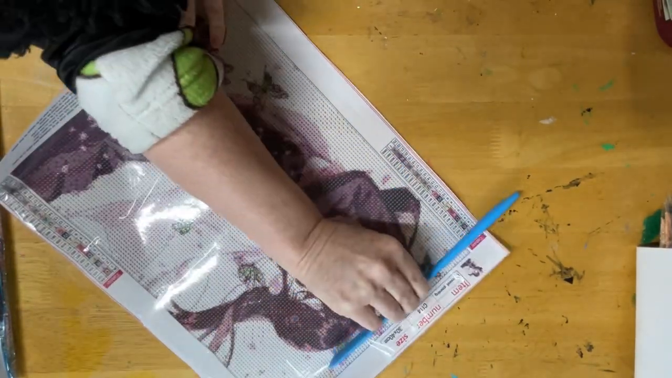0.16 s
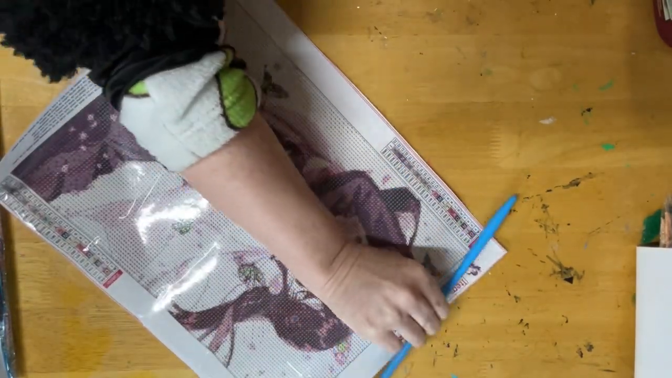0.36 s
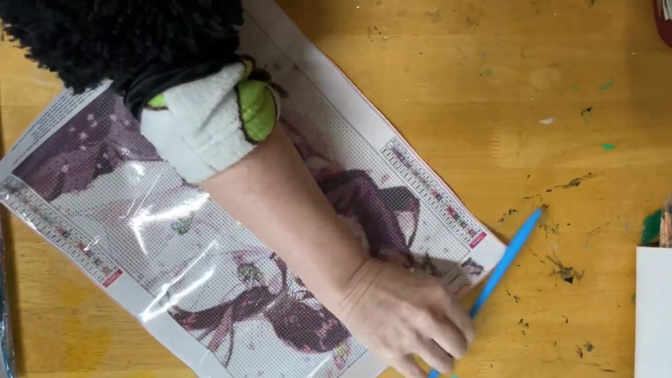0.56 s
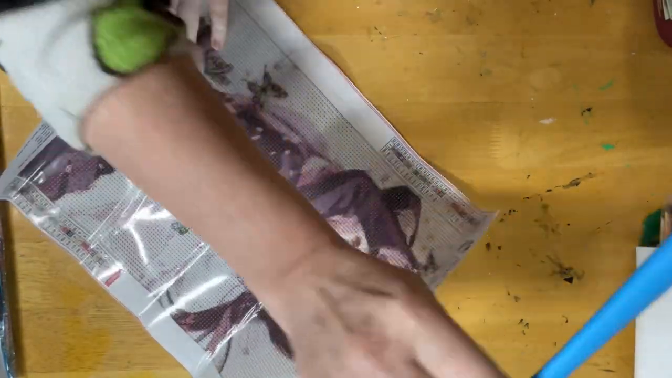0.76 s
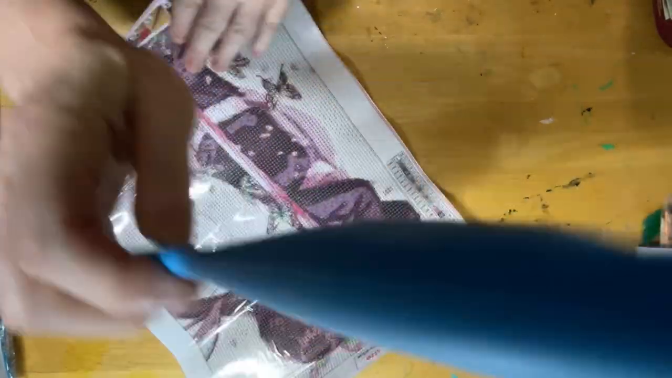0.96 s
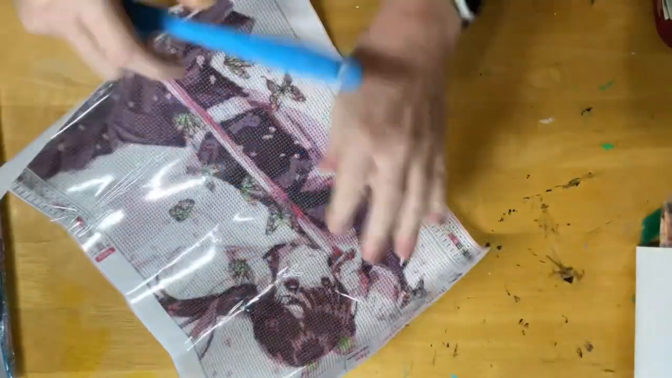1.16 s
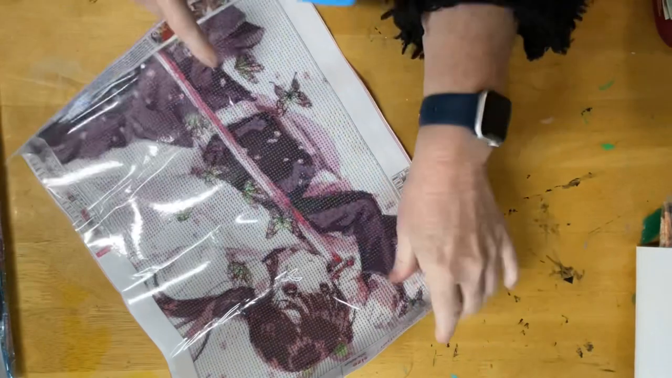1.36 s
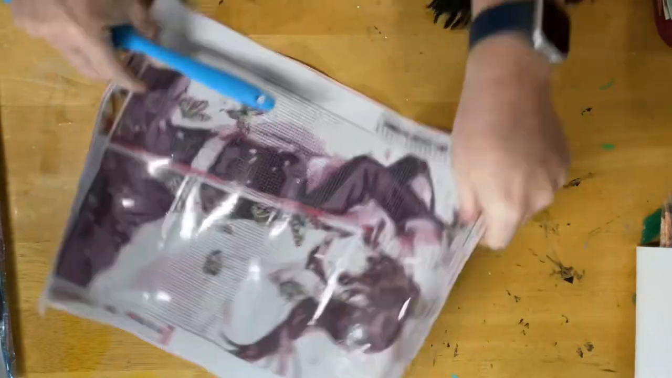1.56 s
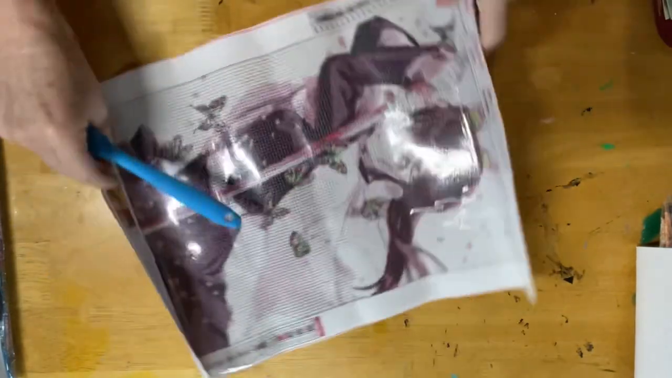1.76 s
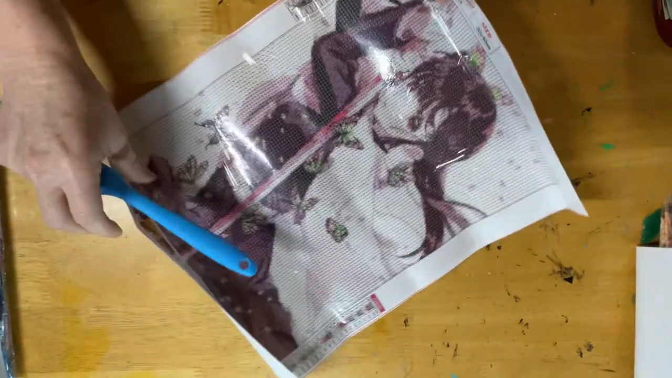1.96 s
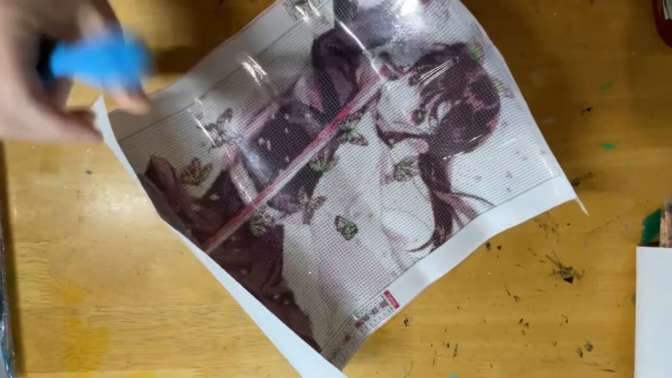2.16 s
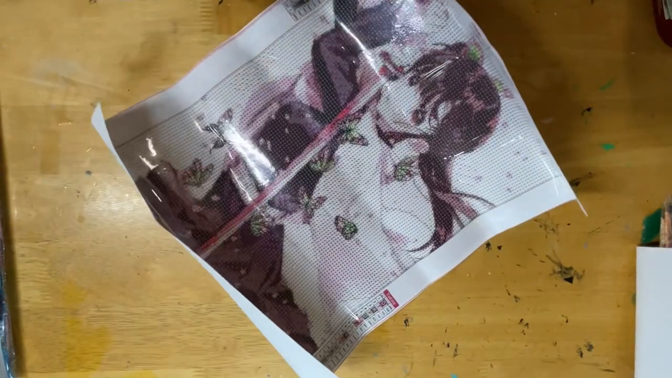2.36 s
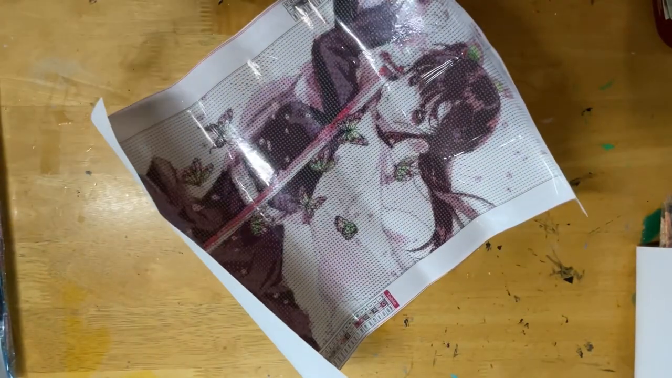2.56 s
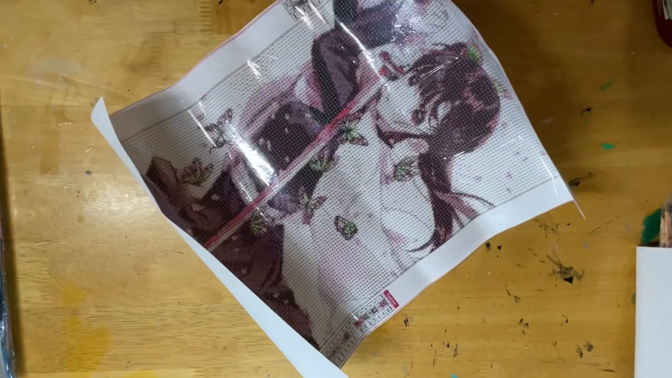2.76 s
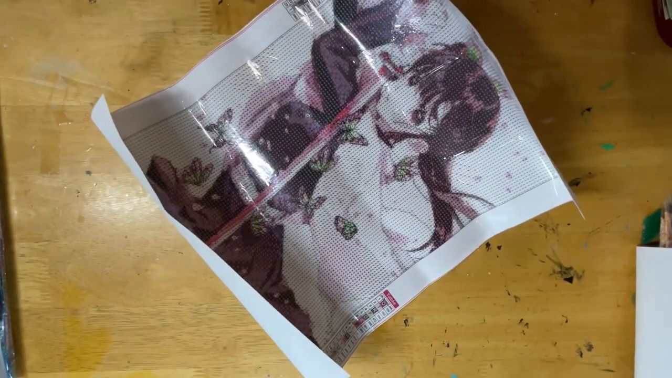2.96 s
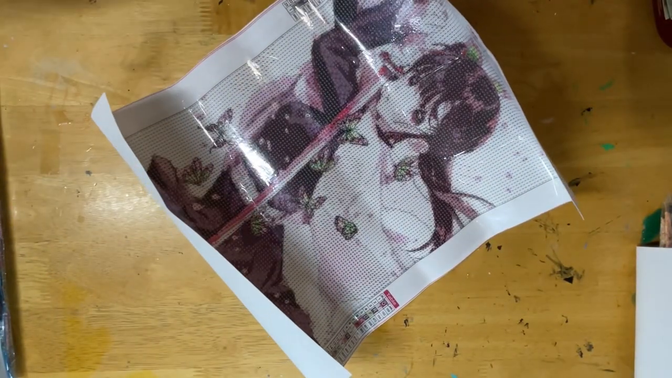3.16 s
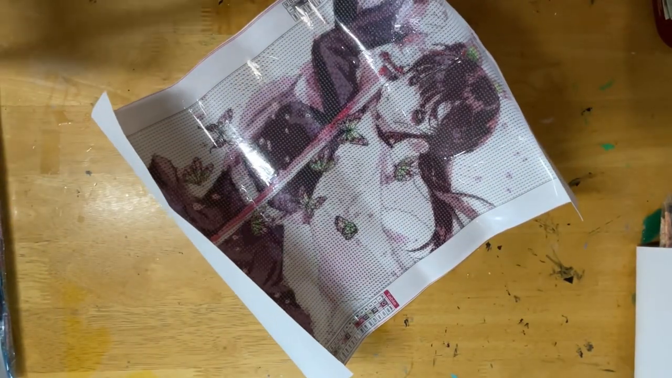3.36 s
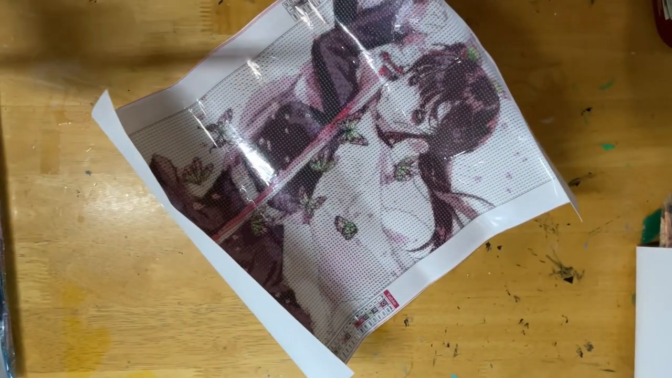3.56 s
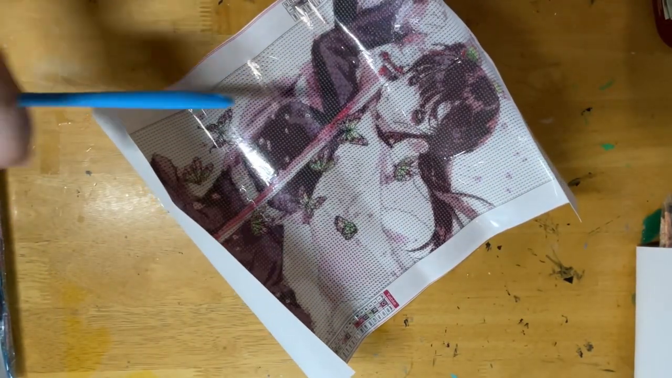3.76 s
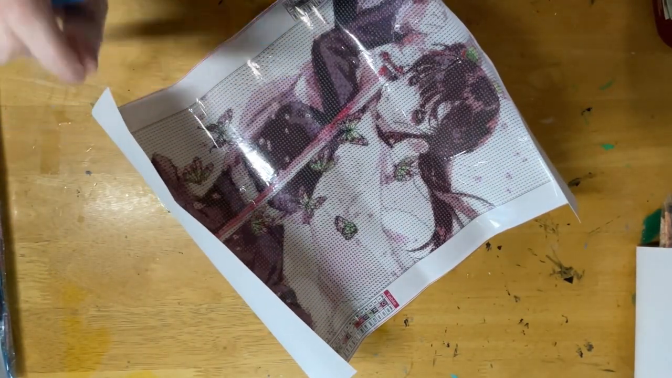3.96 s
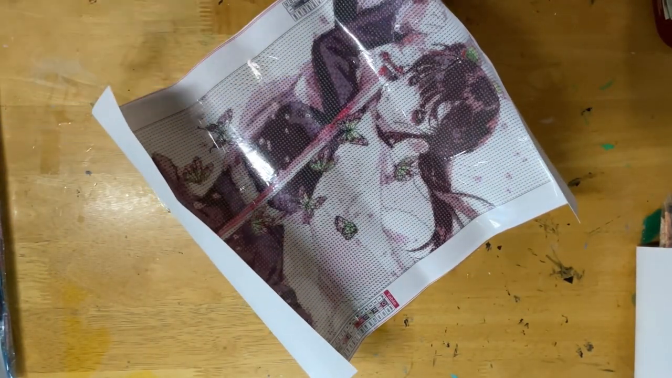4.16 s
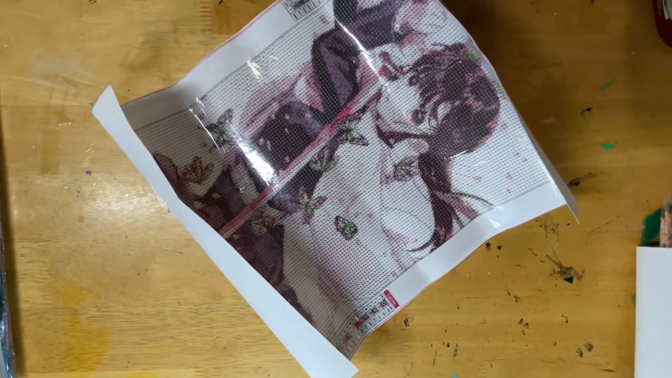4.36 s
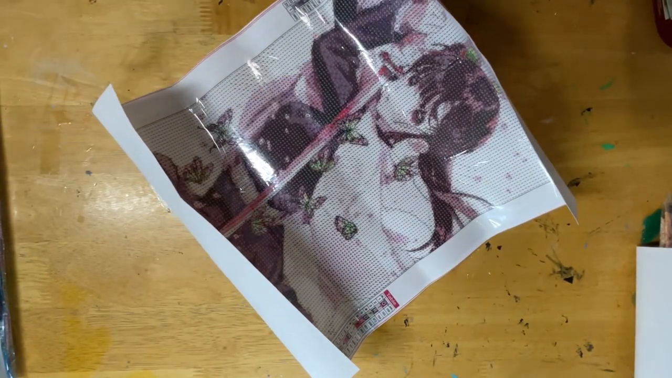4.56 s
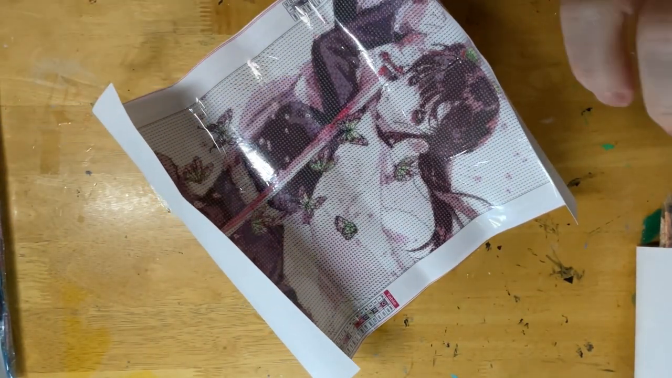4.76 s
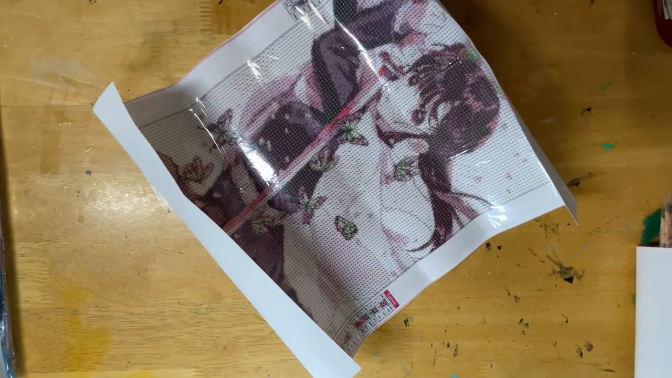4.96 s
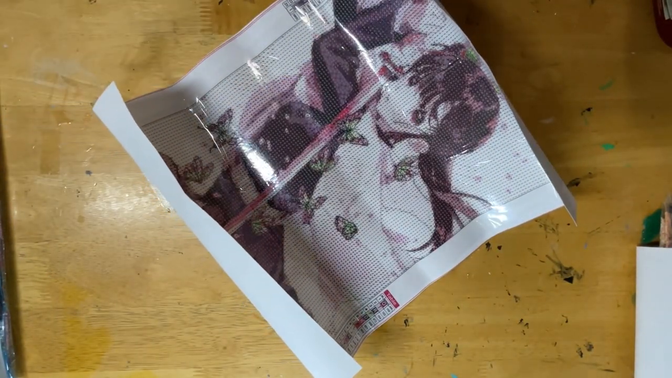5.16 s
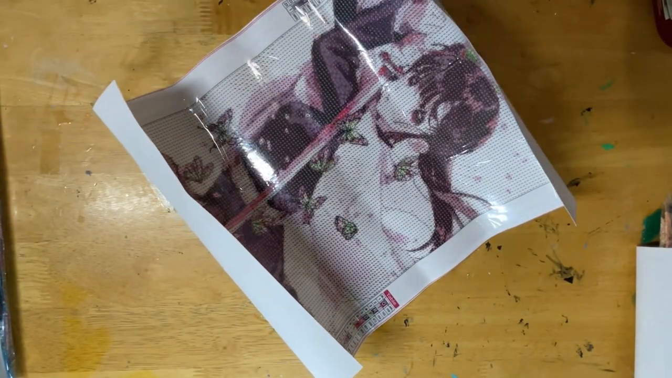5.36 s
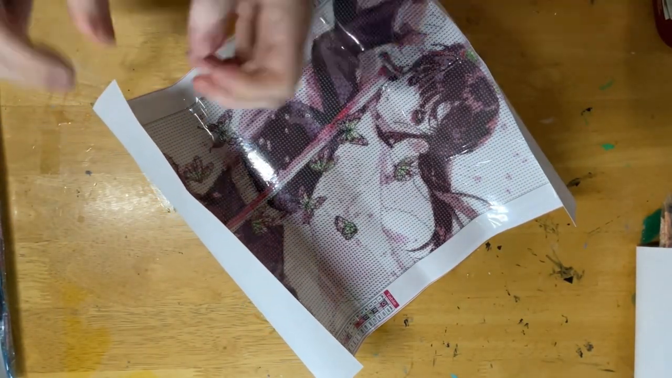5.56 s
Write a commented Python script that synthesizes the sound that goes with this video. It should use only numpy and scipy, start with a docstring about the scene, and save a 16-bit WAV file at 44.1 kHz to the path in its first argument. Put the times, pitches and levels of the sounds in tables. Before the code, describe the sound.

A quiet indoor room, heard closely in stereo from above a wooden table. From 0 to about 1.2 seconds a hand smooths plastic film over canvas: grainy rubbing, dense bright crackle and sharp snaps, strongest near 0.17. A sleeve scuffs at 0.3, then bumps the camera arm at 0.41 to 0.48 with very loud, boomy low thumps and rumble. At 0.94 a tool strikes the arm with a hard, hollow knock and a faint hum. Taps and thuds at 1.2 to 1.4 lead into the canvas dragging from 1.4 to 2.0, a jerky, raspy scrape with low flapping. Sparse crinkles and a tiny hollow tick at 2.24 follow. After 2.4, everything is much softer: a tap at 2.7, muffled thuds and a puff near 2.8, gentler pats at 3.3 and 3.8, and faint clothing swishes until about 5.2, over a low steady hush, with a barely audible dull sleeve brush at the end.

```python
"""On a wooden table under an overhead camera, in a quiet room, a plastic-covered canvas is smoothed by hand.
The film crinkles by snaps and bursts of noise; bumps and a knock ring the camera arm as damped modes.
The canvas is dragged over the wood as jerky friction noise with a shifted rasp and low flapping; a sleeve
scuff, taps, thuds and a small tick are short resonances. Soft puffs of sleeve and hand and, later, swishing
clothes are shaped noise. A short reverberation and steady room air complete the scene."""
import sys
import numpy as np
from scipy import signal
from scipy.fft import rfft, irfft, next_fast_len
from scipy.io import wavfile
from scipy.ndimage import uniform_filter1d, map_coordinates

SR = 44100
rng = np.random.default_rng(int(sys.argv[2]) if len(sys.argv) > 2 else 0)


def pcm_store(signal):
    """Save signal as 16-bit PCM."""
    levels = np.round(np.clip(np.atleast_2d(signal), -1, 1) * 32767)
    wavfile.write(sys.argv[1], SR, levels.astype(np.int16).T)


N = 247135

# Loudest creases snapping. Each row: start in seconds, peak level in dB, centre in Hz, left over right in dB.
CREASE_SNAPS = [(0.049, -31, 2980, -7.5), (0.118, -20, 5870, 0), (0.1662, -11.5, 10600, -0.5),
                (0.2012, -21, 11600, 0), (0.2664, -29, 8980, 4.5), (0.3844, -28, 12000, -1),
                (0.5427, -30, 3550, -1), (0.751, -28, 9300, -0.5), (0.8148, -23, 4500, 0.5),
                (0.8462, -18, 6560, -4), (0.964, -25.5, 6400, -2.5), (1.0197, -38, 2200, 1.5),
                (1.168, -29.5, 9000, 1), (1.2525, -27, 9100, -1.5), (1.3342, -23.5, 11000, -8),
                (2.0096, -30, 11430, -3.5), (2.021, -23, 12400, -1.5), (2.1003, -36, 5400, -2),
                (2.157, -28.5, 8300, -4), (2.276, -38, 3660, -4), (2.425, -28.5, 12000, -7.5),
                (3.199, -39, 10530, 2), (4.5418, -38, 10900, -2)]
# Strokes of the hand across the film. Each row: peak time in seconds, gain in dB, rise and fall in seconds.
HAND_STROKES = [(0.12, -49.5, 0.52, 0.17), (0.41, -48.5, 0.45, 0.36), (0.68, -62, 0.18, 0.13),
                (0.85, -44.5, 0.13, .22), (1.32, -54, 0.21, 0.054)]
# Spectra of the film's crackle and of the rub. Each row: frequency in Hz, relative density in dB per Hz.
CRACKLE_SPECTRUM = [(880, -52), (1500, -19), (2140, -24.5), (2660, -6), (3660, -13), (4920, -4),
                    (7320, -2.5), (10100, -3), (16000, -17.5)]
RUB_SPECTRUM = [(210, -37), (350, -3), (1030, -2), (1910, 3.5), (2490, 0.5), (6470, -1), (7790, -13.5),
                (10600, -5), (14000, -29.5)]
# How hard the canvas slides. Each row: time in seconds, scrape gain in dB.
DRAG_FORCE = [(1.3, -54.5), (1.39, -26), (1.404, -29), (1.46, -20), (1.508, -22.5), (1.516, -22),
              (1.586, -32.5), (1.634, -25), (1.728, -33.5), (1.744, -29), (2.0, -47.5), (2.018, -43),
              (2.14, -72.5)]
# Pitch of the weave's rasp. Each row: time in seconds, frequency in Hz to which 150 Hz is shifted.
RASP_PITCH = [(1.38, 2243), (1.48, 2297), (1.52, 1811), (2.0, 1786)]
# Spectra of scraping and of the flapping sheet. Each row: frequency in Hz, relative density in dB per Hz.
SCRAPE_SPECTRUM = [(240, -32), (400, -13.5), (543, -14), (666, -9.5), (1020, -11), (1740, -3), (2070, -16),
                   (2330, -4.5), (3400, -9), (5270, -9), (6460, -5.5), (7700, -13), (11700, -17),
                   (13000, -25.5), (14500, -50)]
FLAP_SPECTRUM = [(21, -32), (35, -3.5), (75, -0.5), (257, -8), (338, -18), (381, -17), (480, -7),
                 (620, -40.5), (1060, -120)]
# A short scuff of the sleeve, then fingers and tool tapping the table.
# Each row: start in seconds, peak level in dB, centre in Hz.
SCUFF_AND_TAPS = [(0.316, -21.5, 2200), (0.554, -37, 1660), (0.796, -28.5, 2370), (1.233, -23.5, 1500),
                  (1.308, -26.5, 1790), (2.368, -50, 504), (2.68, -32.5, 1010)]
# Hands and canvas thudding on the tabletop. Each row: start in seconds, peak level in dB, centre in Hz.
TABLE_THUDS = [(1.233, -30.5, 77), (1.314, -37, 94), (1.368, -25.5, 119), (1.579, -29.5, 74),
               (1.747, -31, 263), (2.683, -39.5, 140), (2.767, -42.5, 125), (2.832, -33, 240),
               (3.343, -44.5, 233), (3.461, -45, 240), (3.85, -42, 94.5)]
# A small hollow tick. Each row: start in seconds, peak level in dB, frequency in Hz.
HOLLOW_TICKS = [(2.236, -40.5, 768)]
# The sleeve brushing the camera arm. Each row: time in seconds, rumble gain in dB.
SLEEVE_LEVEL = [(0.0, -42.5), (0.24, -40), (0.34, -26.5), (0.44, -34.5), (0.56, -34.5), (0.65, -52.5),
                (0.75, -65.5)]
# The sleeve hitting the arm, and the tool hitting it. Each row: start in seconds, reference level in dB.
ARM_BUMPS = [(0.413, -0.5), (0.446, -5.5), (0.474, -7)]
TOOL_KNOCKS = [(0.936, -13)]
# Modes of the swaying arm and its ringing tube. Each row: frequency in Hz, relative dB, t60 in seconds.
ARM_MODES = [(108.8, 4, 0.15), (135, -4.5, 0.19), (202.8, -6, 0.15), (267.6, 0, 0.1), (301, -8.5, 0.1),
             (378, -8.5, 0.088), (450, -9.5, 0.049)]
TUBE_MODES = [(286, -18, 0.051), (597.4, 2, 0.062), (712, 4, 0.026), (854, 8.5, 0.012), (1020, -16, .02),
              (1916, -36, .025), (590, -28, 1), (977, -37, 0.45), (1090, -42, 0.62)]
# Spectra of the sleeve's rumble, the sleeve dragging at a bump, and the tube's lingering hum.
# Each row: frequency in Hz, relative density in dB per Hz.
RUMBLE_SPECTRUM = [(35, -28), (60, -1), (90, -1), (145, 0.5), (250, -10.5), (400, -25), (800, -34),
                   (1500, -49.5)]
JOLT_SPECTRUM = [(30, -35), (50, -11.5), (95, 3), (140, 15), (280, 1), (400, -4), (700, -11.5), (1400, -34),
                 (3000, -79)]
HUM_SPECTRUM = [(300, -14.5), (590, 0), (850, -8), (1100, -5.5), (1500, -15.5), (4000, -35.5)]
# Soft puffs: a sleeve scuffing, a sleeve meeting the camera arm, then pats of hand on cloth.
# Each row: contact in seconds, peak level in dB, t60 in seconds.
SOFT_PUFFS = [(0.315, -28, 0.11), (0.412, -26.5, 0.16), (2.827, -26.5, 0.13), (3.341, -36, 0.18),
              (3.844, -46, 0.079)]
# Fabric sliding on fabric, and a sleeve reaching forward.
# Each row: peak time in seconds, gain in dB, rise and fall in seconds.
FABRIC_STROKES = [(2.44, -63, 0.18, 0.28), (2.68, -56, 0.12, .35), (2.92, -47.5, 0.16, 0.12),
                  (3.15, -58.5, 0.43, 0.089), (3.36, -59, 0.093, 0.28), (3.47, -53, 0.049, 0.066),
                  (3.70, -51, 0.25, 0.2), (4.22, -63.5, 0.25, .3), (4.36, -48, 0.047, 0.059),
                  (4.43, -56.5, 0.107, 0.28), (4.64, -47, 0.079, 0.099), (4.92, -50, 0.14, 0.082),
                  (5.23, -59.5, 0.11, 0.066)]
REACH_STROKES = [(5.56, -67.5, 0.46, 0.35)]
# Spectra of a soft puff, sliding cloth and room air. Each row: frequency in Hz, relative density in dB per Hz.
PUFF_SPECTRUM = [(120, -16.5), (260, 3.5), (380, -12.5), (540, -0.5), (900, -8.5), (1800, -12),
                 (2700, -6.5), (4000, -16), (7000, -17.5), (12000, -29.5), (15000, -48)]
CLOTH_SPECTRUM = [(240, -43), (400, -15), (719, -9), (839, -6.5), (1330, -3.5), (1530, -0.5), (2430, -5),
                  (5780, -1.5), (7630, -10), (12100, -8), (13300, -18), (14400, -23), (16000, -27.5)]
AIR_SPECTRUM = [(15, -25), (25, 2), (80, 2.5), (117, -6), (277, -14), (489, -20), (560, -21.5), (840, -22),
                (1160, -22), (1840, -26.5), (2110, -26.5), (2410, -24.5), (12500, -40), (14000, -45.5),
                (16000, -72.5)]
# Left-right likeness of drier and wetter sounds. Each row: frequency in Hz, correlation from -1 to 1.
NEAR_LIKENESS = [(100, 0.85), (280, 1), (640, .1), (1400, 0.45), (3100, 0.16), (6800, -0.42), (15000, 0.69)]
FAR_LIKENESS = [(60, 0.83), (130, 0.5), (290, 0.28), (640, 0.23), (1410, 0.14), (3100, -0.43),
                (6820, 0.012), (15000, 0.09)]
# Decay of the room. Each row: frequency in Hz, t60 in seconds.
ROOM_DECAY = [(150, 0.3), (1500, 0.11), (6000, 0.52), (14000, 0.29)]

TOP_HZ = 16500  # band limit
SNAP_T60_S, SHIVER_DB = .008, -31  # decay of a crease's flip; the film's shiver beside it
CRACKLE_DB, FRESH_DB, FLATTEN_S = -4, 11, .25  # crackle over rub; extra on creased film; its time scale
STROKE_SHAPE = 1.62  # a stroke's top: 1 pointed, 2 round
FLAP_DB, FLAP_GROWS = -43.5, 0.81  # flapping at the hardest pull; dB of flapping per dB of scrape
CONTACT_RING_Q, CONTACT_T60_S = 2.1, 0.048  # resonance and decay of a short contact
AIR_DB = -58


def crinkles():
    """Sudden buckling: a crease flips within milliseconds and the film around it shivers briefly."""
    out, t = np.zeros((2, N)), np.arange(SR // 16) / SR
    flip = amp(-60 * t / SNAP_T60_S) * (1 - np.exp(-t / .0002))
    shiver = amp(SHIVER_DB - 60 * t / .04)
    spectrum = [(1000, -2), (12500, 5), (15000, -8.5)]
    likeness = [(1000, 0.15), (12000, 0.27)]
    for s, db, hz, pan_db in CREASE_SNAPS:
        burst = stereo(noise(len(t)), spectrum, likeness) * (flip + shiver)
        snap = filtered(burst, lambda f: resonance(f, hz, q=1.0) * (f < TOP_HZ))
        add(out, s, panned(amp(db) * peaked(snap), pan_db))
    return out


def smoothing():
    """Many small bucklings crackle over grainy friction; the extra crackle fades as the film flattens."""
    creased = np.exp(-(np.arange(N) / SR / FLATTEN_S) ** 2)
    creases = slips(rate=420, spread_db=5, life=.0006)
    crackle = amp(CRACKLE_DB + FRESH_DB * creased) * stereo(creases, CRACKLE_SPECTRUM, NEAR_LIKENESS)
    grains = slips(rate=1300, spread_db=6, life=.002)
    rub = stereo(patchy(grains, depth_db=3.5), RUB_SPECTRUM, NEAR_LIKENESS)
    return panned(crackle + rub, -3.0) * strokes(HAND_STROKES)


def drag():
    """Stick-slip friction: the canvas scrapes in jerks, its weave rasps, and a harder pull flaps it more."""
    scrape_db, = curves(DRAG_FORCE)
    scratch_db = scrape_db + .5 * wobble(70) + 1.2 * wobble(260)
    scratch = amp(scratch_db) * (amp(-1.5) * scrape() + amp(-7.0 + 1.2 * wobble(90)) * rasp())
    flutter_db = 2.5 * wobble(25)
    flap_db = FLAP_DB + FLAP_GROWS * (scrape_db - scrape_db.max()) + flutter_db
    flap = amp(flap_db) * stereo(noise(), FLAP_SPECTRUM, [(60, 0.97), (130, 0.51), (300, 0.34)])
    return panned(scratch + flap, -0.58) * during(DRAG_FORCE)


def scrape():
    """Friction as many tiny slips; the sheet keeps changing shape, so its emphasis shifts in frequency."""
    grains = patchy(slips(rate=2600, spread_db=4, life=.0005), depth_db=2.3)
    creases = .4 * slips(rate=320, spread_db=3, life=.0006)  # crackle on top of the sliding
    return stereo(grains + creases, SCRAPE_SPECTRUM, NEAR_LIKENESS)


def rasp():
    """Frequency shifting: a narrow noise band is carried up to the weave's wavering rasp."""
    rasp_hz, = curves(RASP_PITCH)
    spectrum = [(1, -1), (220, 4.5), (500, -6), (1100, -29.5), (2000, -88.5)]
    band = stereo(noise(), spectrum, [(100, 0.72)])
    shift_hz = rasp_hz - 150 + 130 * wobble(40)
    carrier = np.exp(2j * np.pi * np.cumsum(shift_hz) / SR)
    return np.real(signal.hilbert(band) * carrier)


def scuff_and_taps():
    """Strong damping: a short contact, scuff or tap, excites a broad resonance and dies at once."""
    out, t = np.zeros((2, N)), np.arange(SR // 2) / SR
    spectrum = [(200, 10.5), (1500, -10.5), (3000, -13.5), (7000, -5.5), (14000, -18.5)]
    for s, db, hz in SCUFF_AND_TAPS:
        excitation = stereo(noise(len(t)), spectrum, NEAR_LIKENESS) * amp(-60 * t / CONTACT_T60_S)
        contact = filtered(excitation, lambda f: resonance(f, hz, q=CONTACT_RING_Q))
        add(out, s, panned(amp(db) * peaked(contact), -3.0))
    return out


def thuds():
    """Soft impact: a blow with little treble sets off a damped resonance of the tabletop."""
    out, t = np.zeros((2, N)), np.arange(SR // 2) / SR
    spectrum = [(40, 8.0), (90, -5.5), (260, -0.5), (360, -2), (900, -13.5), (3000, -56.5)]
    envelope = amp(-60 * t / 0.13) * (1 - np.exp(-t / 0.0021))
    for s, db, hz in TABLE_THUDS:
        push = stereo(noise(len(t)), spectrum, [(80, 0.98), (300, .4)]) * envelope
        thud = filtered(push, lambda f: resonance(f, hz, q=3.5))
        add(out, s, panned(amp(db) * peaked(thud), -1))
    return out


def hollow_ticks():
    """Free vibration: a single damped mode gives a small hollow tick."""
    out, t = np.zeros((2, N)), np.arange(SR // 2) / SR
    for s, db, hz in HOLLOW_TICKS:
        tick = ring([(hz, 0, .018)], t, attack=0.0014, lag=.0001)
        add(out, s, amp(db) * peaked(tick))
    return out


def sleeve_rumble():
    """Friction on a solid body: the sleeve brushing the arm is heard as low rumble."""
    rumble = stereo(noise(), RUMBLE_SPECTRUM, NEAR_LIKENESS)
    return amp(curves(SLEEVE_LEVEL)[0]) * rumble * during(SLEEVE_LEVEL)


def arm_bumps():
    """Impulse response: a soft bump sways the arm in its low modes while the sleeve drags on it."""
    out, t = np.zeros((2, N)), np.arange(SR) / SR
    envelope = amp(-60 * t / 0.17) * (1 - np.exp(-t / 0.0031))
    for s, db in ARM_BUMPS:
        jolt = stereo(noise(len(t)), JOLT_SPECTRUM, [(100, 0.55), (200, -0.58), (500, -0.3)]) * envelope
        sway = peaked(ring(ARM_MODES, t, attack=0.0076, lag=0.00024))
        add(out, s, panned(amp(db - 3.0) * sway + amp(db - 12.5) * jolt, -1.7))
    return out


def tool_knocks():
    """Hard impact: the tool cracks against the arm and excites the tube's modes, which hum on faintly."""
    out, t = np.zeros((2, N)), np.arange(SR) / SR
    spectrum = [(300, 1.5), (1000, -4.0), (2000, -4.0), (4000, -12.5), (6500, -7), (9000, -20), (14000, -32.5)]
    for s, db in TOOL_KNOCKS:
        crack = peaked(stereo(noise(len(t)), spectrum, NEAR_LIKENESS) * amp(-60 * t / 0.039))
        hum = amp(-31) * stereo(noise(len(t)), HUM_SPECTRUM, NEAR_LIKENESS) * amp(-60 * t / .8)
        tube = peaked(ring(TUBE_MODES, t, attack=0.0021, lag=.0008))
        add(out, s, panned(amp(db - 3.5) * crack, -12.5) + amp(db) * hum)
        add(out, s + .0012, panned(amp(db - 0.5) * tube, -4.5))
    return out


def soft_puffs():
    """Compliant contact: a soft surface is met in a puff that swells over milliseconds and dies away."""
    out, t = np.zeros((2, N)), np.arange(SR // 2) / SR
    swell = 1 - np.exp(-t / .012)
    for s, db, t60 in SOFT_PUFFS:
        puff = stereo(noise(len(t)), PUFF_SPECTRUM, FAR_LIKENESS) * swell * amp(-60 * t / t60)
        add(out, s - .003, panned(amp(db) * peaked(puff), -3.7))
    return out


def clothes():
    """Fibre friction: fabric swishes in strokes as noise; a sleeve reaching forward brushes more dully."""
    fibres = patchy(slips(rate=4000, spread_db=-1, life=0.0027), depth_db=2.5)
    flicker = amp(0.17 * wobble(30))
    swish = strokes(FABRIC_STROKES) * flicker * stereo(fibres, CLOTH_SPECTRUM, FAR_LIKENESS)
    dull = [(90, -26), (200, -1.5), (330, 3.0), (600, -16.0), (1500, -43.0), (4000, -46)]
    brush = strokes(REACH_STROKES) * stereo(noise(), dull, FAR_LIKENESS)
    return panned(swish + brush, -4)


def room(x):
    """Reverberation: convolution with noise whose decay time depends on frequency, shortest near 1500 Hz."""
    hz, t, z = signal.stft(noise(SR // 2), SR, nperseg=256)
    decay = amp(-60 * t / along(ROOM_DECAY, hz)[:, None])
    tail = signal.istft(z * decay, SR, nperseg=256)[1]
    return signal.fftconvolve(x, tail / np.linalg.norm(tail[0]), axes=1)[:, :N]


def room_air():
    """Stationary noise: the quiet room is a steady, mostly low-pitched hush."""
    return panned(amp(AIR_DB) * stereo(noise(), AIR_SPECTRUM, FAR_LIKENESS), -1.5)


def amp(db):
    """Logarithmic level: decibels to amplitude gain."""
    return 10 ** (np.asarray(db) / 20)


def unit(x):
    """Normalisation to rms 1."""
    return x / np.sqrt(np.mean(x ** 2) + 1e-20)


def along(points, hz):
    """Interpolation of (Hz, value) points on a logarithmic frequency axis."""
    f, v = np.transpose(points)
    return np.interp(np.log(hz + 1), np.log(f + 1), v)


def curves(rows):
    """Linear interpolation: one value per sample for each column after the time."""
    s, *cols = np.transpose(rows)
    return [np.interp(np.arange(N) / SR, s, c) for c in cols]


def during(rows):
    """Gating: 1 while a curve lasts, with short fades outside it."""
    s, t = np.asarray(rows)[..., 0], np.arange(N) / SR
    return np.clip(1 + np.minimum(t - s.min(), s.max() - t) / 0.061, 0, 1)


def wobble(rate):
    """Spline interpolation of random knots, rate a second, gives a smooth curve."""
    knots = rng.standard_normal(int(N * rate / SR) + 4)
    return map_coordinates(knots, [np.arange(N) * rate / SR])


def filtered(x, response):
    """Linear filtering: the spectrum of x times a response of frequency."""
    size = x.shape[-1]
    m = next_fast_len(size + 8192)  # padding leaves room for the ringing
    return irfft(rfft(x, m) * response(np.fft.rfftfreq(m, 1 / SR)), m)[..., :size]


def resonance(f, hz, q):
    """Damped oscillator: causal band-pass response."""
    damping = 1j * f * hz / q
    return damping / (hz * hz - f * f + damping)


def stereo(pair, spectrum, alike):
    """Interchannel correlation: coloured mid and side give left and right, whose mean has rms 1."""
    def response(hz):
        turn = np.arccos(np.clip(along(alike, hz), -.98, .98)) / 2
        return amp(along(spectrum, hz)) * [np.cos(turn), np.sin(turn)]
    mid, side = filtered(pair, response)
    return np.array([mid + side, mid - side]) / np.std(mid)


def noise(size=N):
    """Random excitation: two unrelated white noises."""
    return rng.standard_normal((2, size))


def slips(rate, spread_db, life):
    """Shot noise: bursts of random size, rate a second, whose power dies to 1/e in life seconds."""
    starts = rng.random(N) < rate / SR
    sizes = starts * amp(spread_db * np.minimum(rng.standard_normal(N), 2))
    power = signal.lfilter([1], [1, -np.exp(-1 / (life * SR))], sizes ** 2)
    return unit(noise() * np.sqrt(power))


def patchy(pair, depth_db):
    """Spectral modulation: gain varies in patches of a few hundred Hz and a few tens of milliseconds."""
    z = signal.stft(pair, nperseg=256)[2]
    field = uniform_filter1d(rng.standard_normal(z.shape[1:]), size=3, axis=0)  # across frequency
    field = uniform_filter1d(field, size=6, axis=1)  # across time
    return signal.istft(z * amp(depth_db * unit(field)), nperseg=256)[1][:, :N]


def strokes(rows):
    """Sliding envelopes summed in power: each swells 20 dB over its rise and dies 20 dB over its fall."""
    t, gains = np.arange(N) / SR, []
    for s, db, rise, fall in rows:
        distance = np.abs(np.maximum((s - t) / rise, (t - s) / fall))
        gains.append(amp(db - 20 * distance ** STROKE_SHAPE))
    return np.linalg.norm(gains, axis=0)


def panned(x, pan_db):
    """Level difference: raises left over right by pan_db."""
    return x * amp([[pan_db / 2], [-pan_db / 2]])


def peaked(x):
    """Normalisation so that the mean of both channels peaks at 1."""
    return x / np.abs(x.mean(0)).max()


def add(track, s, sound):
    """Superposition: mixes a sound in at time s."""
    part = track[:, max(round(s * SR), 0):][:, :sound.shape[1]]
    part += sound[:, :part.shape[1]]


def ring(modes, t, attack, lag):
    """Modal sum of damped sines; the left microphone hears them lag seconds late."""
    t = np.maximum(t - np.array([[lag], [0]]), 0)
    total = sum(amp(db - 60 * t / t60) * np.sin(2 * np.pi * hz * t) for hz, db, t60 in modes)
    return total * (1 - np.exp(-t / attack))


def scene():
    """Direct and reverberant paths: puffs and clothes are wetter; the arm's body carries its sound unechoed."""
    near = crinkles() + smoothing() + drag() + scuff_and_taps() + thuds() + hollow_ticks()
    far = soft_puffs() + clothes()
    arm = sleeve_rumble() + arm_bumps() + tool_knocks()
    echo = room(amp(-14) * near + amp(-9) * far)
    return near + far + echo + arm + room_air()


def record(dry):
    """Band limiting and overload: the camera cuts the deepest bass, clips at full scale and stops at TOP_HZ."""
    lean = signal.sosfilt(signal.butter(4, 47, "highpass", fs=SR, output="sos"), dry)
    return filtered(np.clip(lean, -1, 1), lambda hz: hz < TOP_HZ)


dry = scene()
out = record(dry)
pcm_store(out)
```